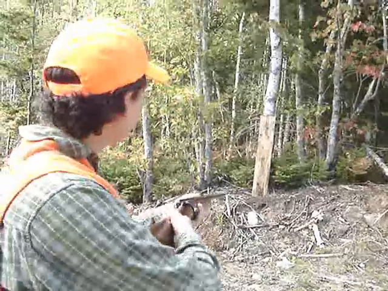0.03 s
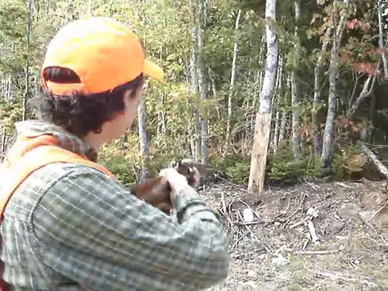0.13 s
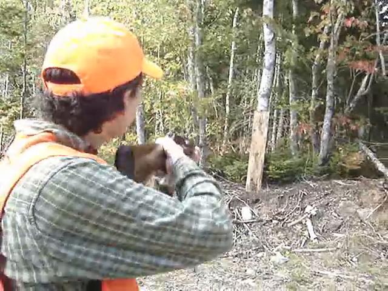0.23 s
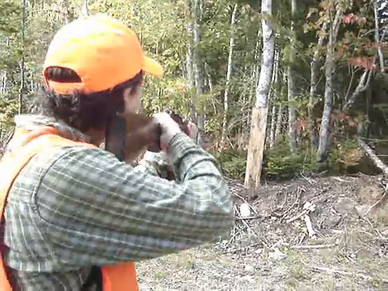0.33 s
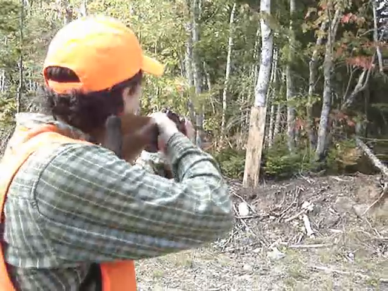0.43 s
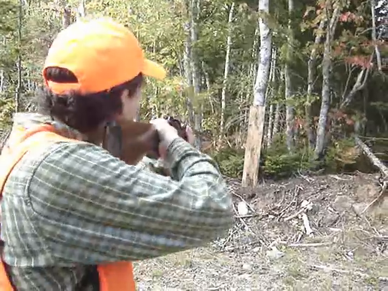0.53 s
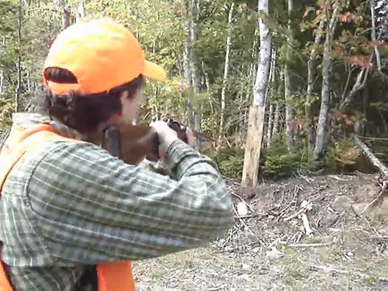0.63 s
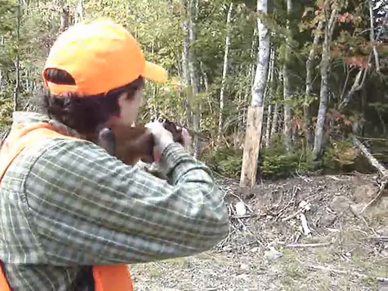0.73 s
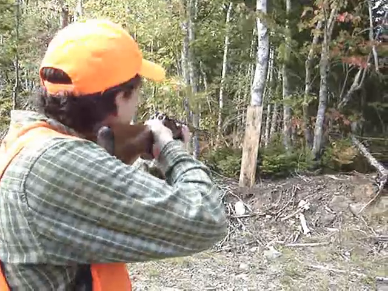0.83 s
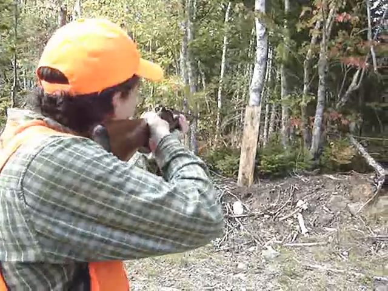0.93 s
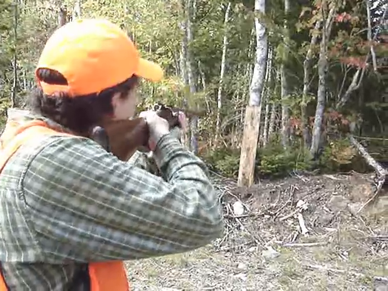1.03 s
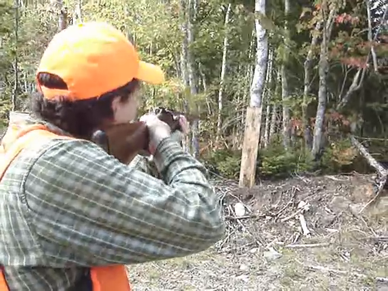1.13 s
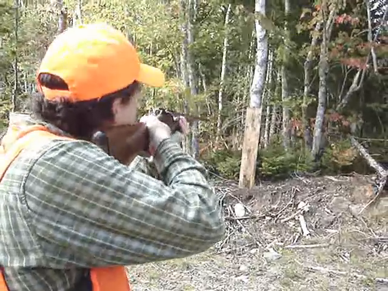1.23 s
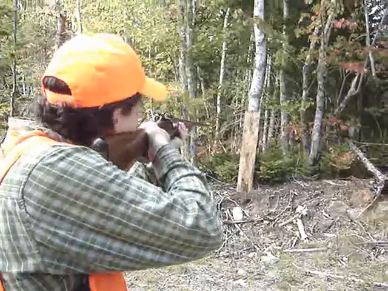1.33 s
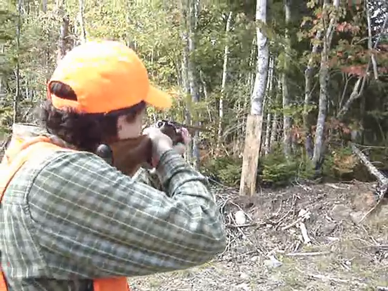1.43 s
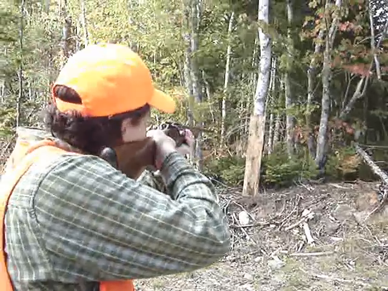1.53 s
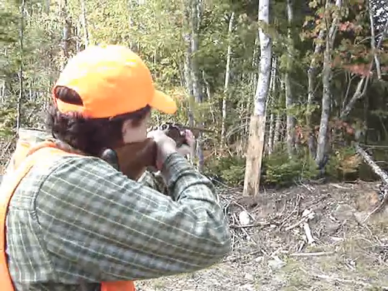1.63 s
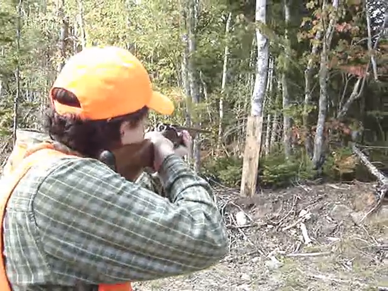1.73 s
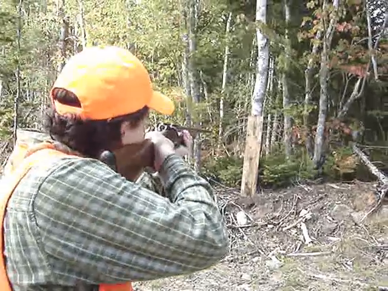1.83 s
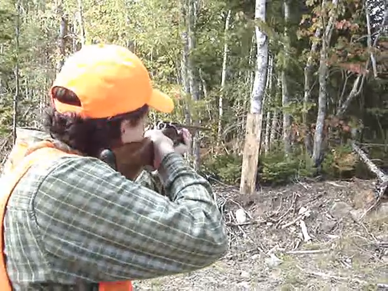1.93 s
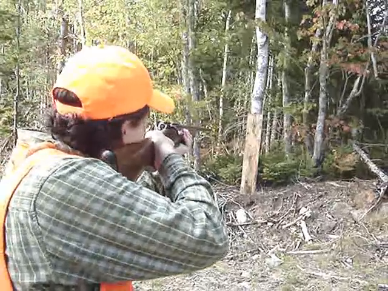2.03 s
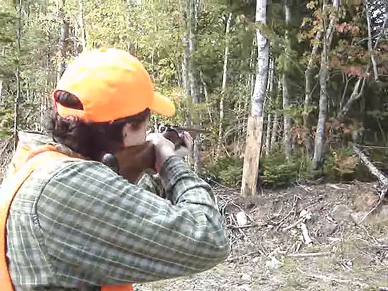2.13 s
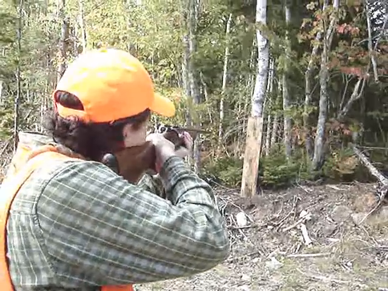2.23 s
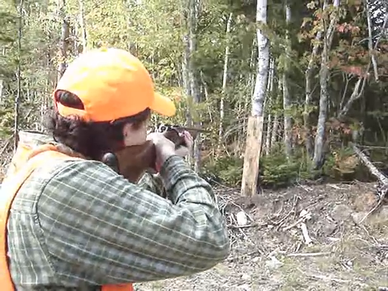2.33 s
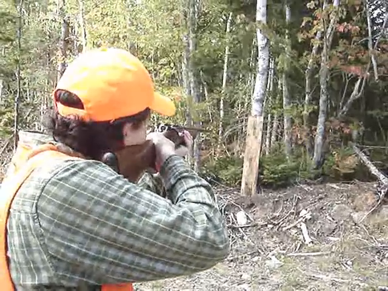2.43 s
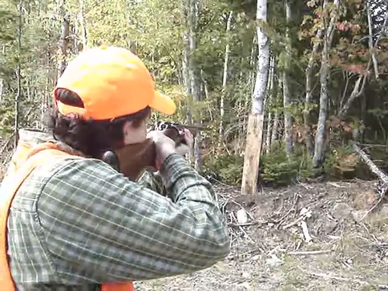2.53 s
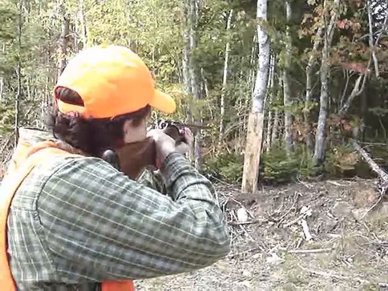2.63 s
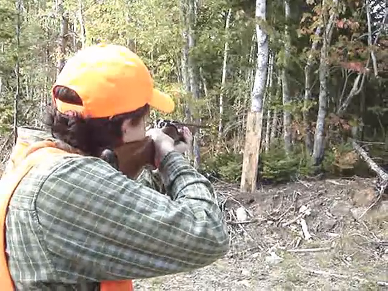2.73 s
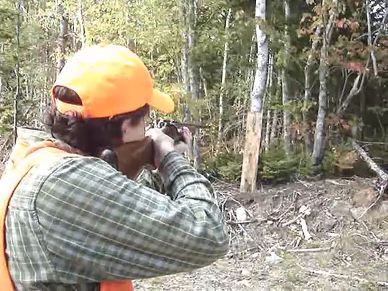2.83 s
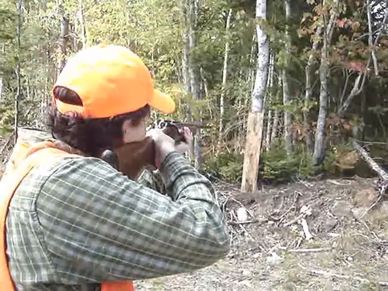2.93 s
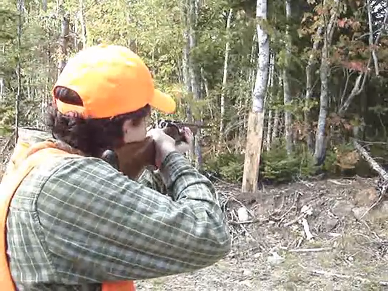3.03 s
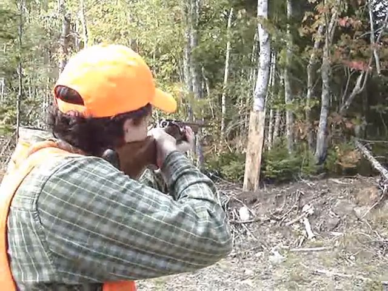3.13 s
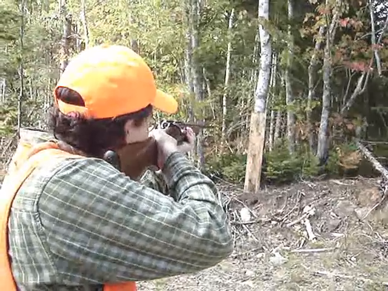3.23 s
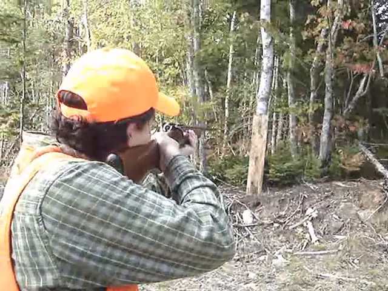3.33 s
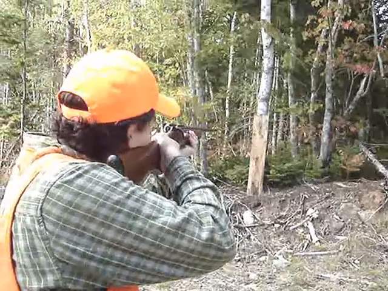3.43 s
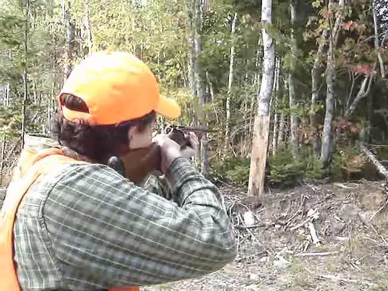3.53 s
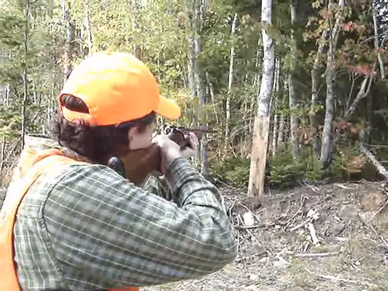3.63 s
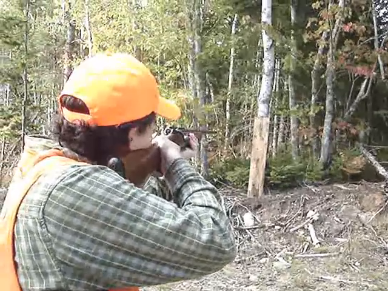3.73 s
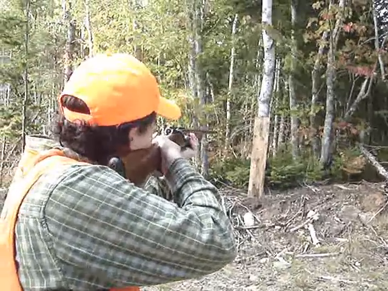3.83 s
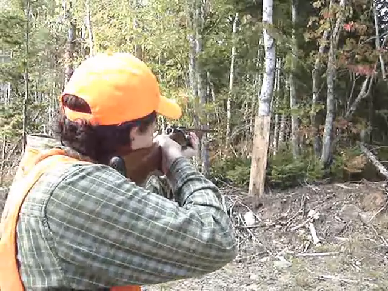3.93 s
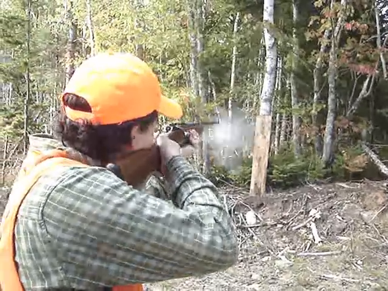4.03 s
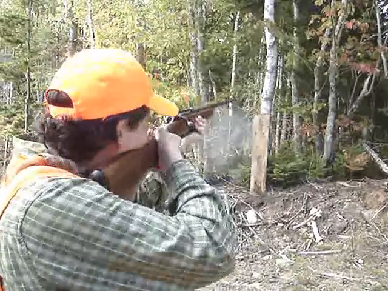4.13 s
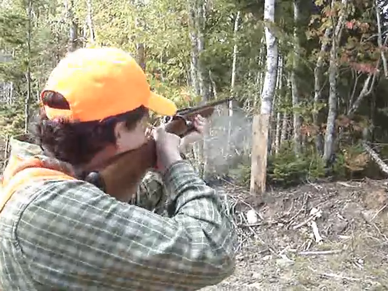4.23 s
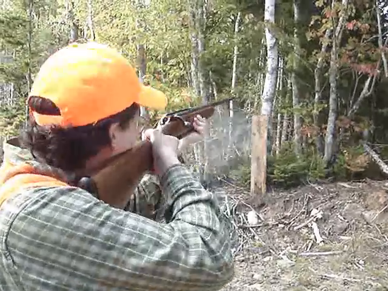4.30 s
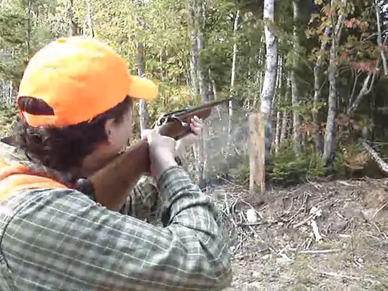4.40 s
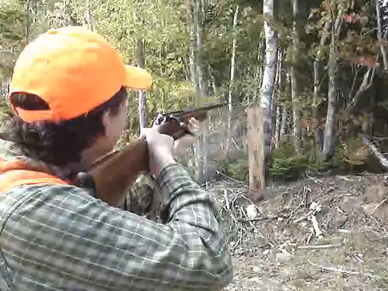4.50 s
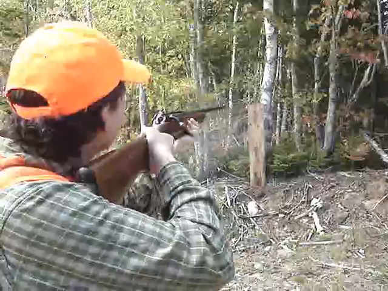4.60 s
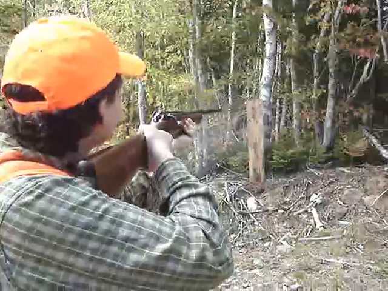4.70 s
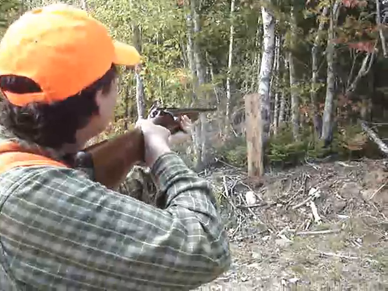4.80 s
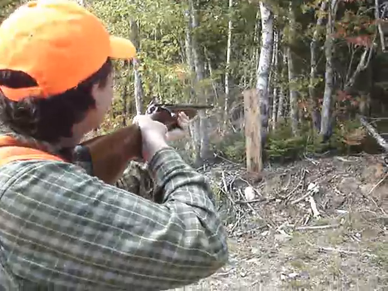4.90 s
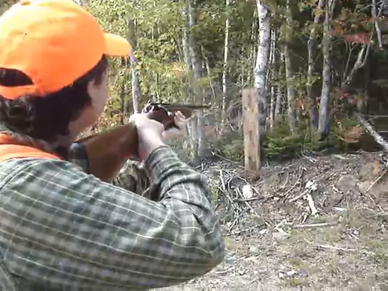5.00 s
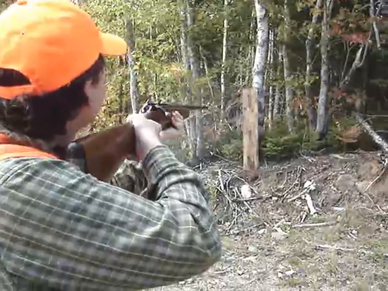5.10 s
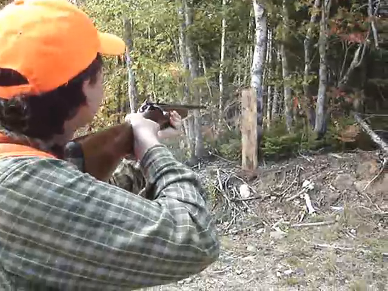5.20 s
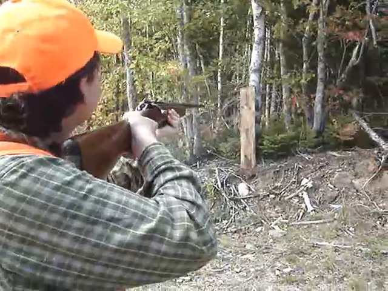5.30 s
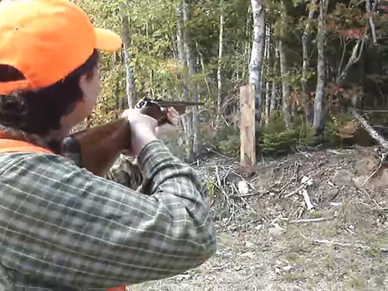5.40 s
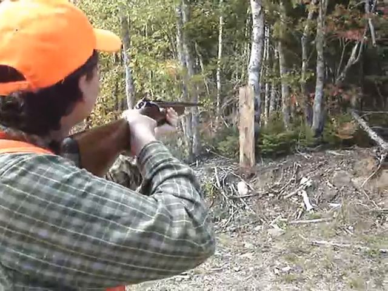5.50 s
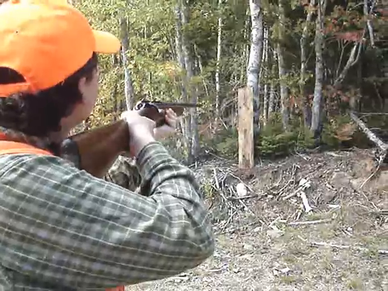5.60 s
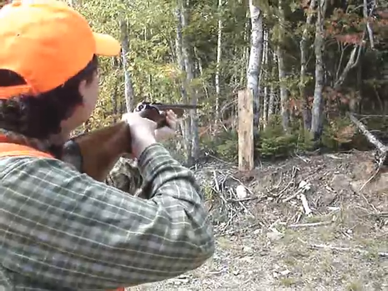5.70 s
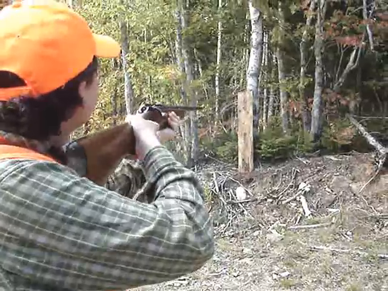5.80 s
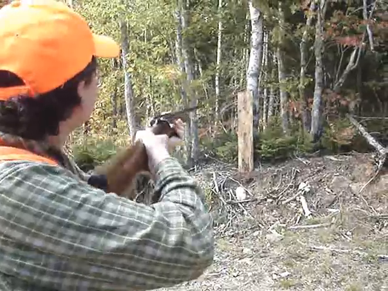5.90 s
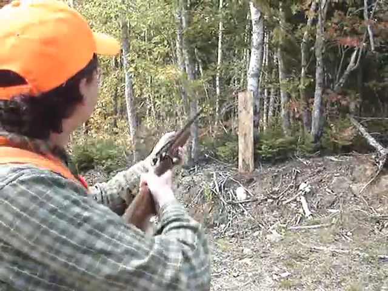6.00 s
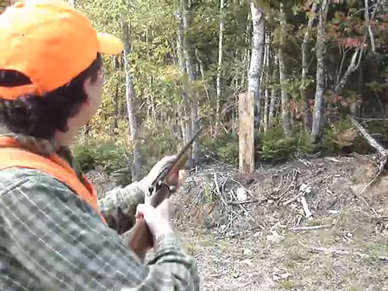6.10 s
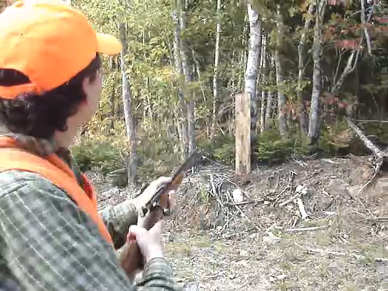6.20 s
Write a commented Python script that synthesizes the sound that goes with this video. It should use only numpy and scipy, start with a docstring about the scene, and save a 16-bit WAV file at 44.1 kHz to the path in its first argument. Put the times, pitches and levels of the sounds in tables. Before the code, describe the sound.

Very quiet clearing: leaf breeze, faint high whistle, evenly spaced soft insect trills and several brighter three-stroke chirps. Sleeves slide at the start. Then a sudden hammer snap and explosive shot, close and distorted on a small automatic-level microphone, with dense bright scatter from nearby trees and a deeper-placed mid-toned forest roll that dips and swells while dying away. Light stock taps, a clearer knock and fabric rustle end it.

```python
"""Shotgun shot at the edge of a wood

One shot, heard from just behind the shooter, amid breeze, steady thin tones and two crickets.
The blast is a train of pressure pushes; decaying noise forms the near scatter and the forest's roll.
Gain control ducks and creeps back while peaks saturate; knocks and rustles follow as the gun is lowered.
"""
import sys
import numpy as np
from scipy import signal
from scipy.fft import rfft, irfft, next_fast_len
from scipy.io import wavfile
from scipy.ndimage import uniform_filter1d, map_coordinates

SR = 44100
rng = np.random.default_rng(int(sys.argv[2]) if len(sys.argv) > 2 else 0)


def output_pcm(signal):
    """Save a mono or channel-first signal as 16-bit PCM at the path in sys.argv[1].

    Samples are clipped to [-1, 1] before scaling.
    """
    pcm = np.clip(np.atleast_2d(signal).T, -1, 1) * 32767
    wavfile.write(sys.argv[1], SR, np.round(pcm).astype(np.int16))


N = 275669

SHOT_S = 4.1606  # the blast reaches the microphone
STROKE_S = 0.026  # length of a cricket's wing stroke


def amp(db):
    """Decibels to gain."""
    return 10 ** (np.asarray(db) / 20)


def unit(x):
    """Scale to rms 1."""
    return x / np.sqrt(np.mean(x ** 2) + 1e-20)


def clock():
    """Time of every sample, s."""
    return np.arange(N) / SR


def along(points, hz):
    """Interpolate (f/Hz, value) points on a log frequency axis."""
    f, v = np.transpose(points)
    return np.interp(np.log(hz + 1), np.log(f + 1), v)


def wobble(rate_hz):
    """Smooth random curve with rate_hz knots a second."""
    knots = rng.standard_normal(int(N * rate_hz / SR) + 4)
    return map_coordinates(knots, [clock() * rate_hz])


def swell(middle_s, spread_s):
    """Bell-shaped rise and fall with a top of 1, down to 1/e at spread_s from the middle."""
    return np.exp(-((clock() - middle_s) / spread_s) ** 2)


def filtered(x, response):
    """Multiply the spectrum of x by a response of frequency."""
    m = next_fast_len(N + SR // 2)
    return irfft(rfft(x, m) * response(np.fft.rfftfreq(m, 1 / SR)), m)[:N]


def noise(colour):
    """Noise of rms 1 shaped by (f/Hz, relative level/dB) points."""
    return unit(filtered(rng.standard_normal(N), lambda hz: amp(along(colour, hz))))


def band(centre_hz, width_hz):
    """Narrow noise of rms 1."""
    return unit(filtered(rng.standard_normal(N), lambda hz: 1 / (1 + ((hz - centre_hz) / width_hz) ** 4)))


def background(air_db=-53.55, sway_db=0.2, lull_db=-70, gust_spread_s=0.2):
    """Light breeze in leaves over hiss, swaying slowly; a low murmur in the wood swells with each gust."""
    # breeze and hiss spectrum: f/Hz, relative level/dB
    air_colour = [(25, -10.5), (60, -5), (110, -5), (280, -0.5), (700, -1.3), (1300, -6), (2200, -7),
                  (2500, -9), (3500, -9.7), (5000, -9), (6500, -14), (8500, -15), (9900, -19.5),
                  (10300, -27), (15500, -24.5)]
    # gusts deep in the wood: t/s, level/dB
    gusts = [(.28, -60), (1.2, -60.5), (2.33, -66), (5.95, -62)]
    breeze = noise(air_colour) * amp(air_db + sway_db * wobble(1.3))
    gust_power = sum((amp(db) * swell(s, gust_spread_s)) ** 2 for s, db in gusts)
    wind = np.sqrt(amp(lull_db) ** 2 + gust_power)
    murmur = band(centre_hz=289, width_hz=115) * wind * amp(1.7 * wobble(7.6))
    return breeze + murmur


def whine(restart_hz=29.98, halo_db=-72):
    """Thin electronic tones whose phase restarts at restart_hz, with a narrow band of hiss."""
    # steady tones: f/Hz, level/dB
    tones = [(7870, -62), (8940, -72.5), (12042, -79.5)]
    since_restart_s = clock() % (1 / restart_hz)
    whistle = sum(amp(db) * unit(np.sin(2 * np.pi * hz * since_restart_s)) for hz, db in tones)
    return whistle + amp(halo_db) * band(centre_hz=7600, width_hz=300)


def sleeves():
    """Flannel sleeves slide as the gun is raised and lowered: swells of soft coloured noise."""
    # arm movements: t/s, spread/s, level/dB
    movements = [(.16, 0.54, -57), (6.2, 0.51, -56.5)]
    swish = noise([(300, -11), (900, 1.5), (2100, 5), (2700, -2), (3300, 2.5), (5000, -7), (9000, -16)])
    return swish * sum(amp(db) * swell(s, spread_s) for s, spread_s, db in movements)


def far_cricket(period_s=0.48, level_db=-61, spread_s=0.11, flutter_db=2):
    """Evenly spaced chirps; distance smears each into a soft, fluttering swell of narrow noise."""
    # singing bouts: first chirp/s, end/s
    bouts = [(.14, 4.1), (5.24, 6.3)]
    trill = unit(band(centre_hz=5430, width_hz=220) * amp(flutter_db * wobble(50)))
    times_s = [s for start_s, end_s in bouts for s in np.arange(start_s, end_s, period_s)]
    return trill * sum(swell(s, spread_s) for s in times_s) * amp(level_db)


def wing_stroke(hz, sag_hz=150, rough_rad=0.69):
    """Short raspy tone, highest where the wing is fastest; the scraper catches the teeth unevenly."""
    # faint inharmonic high tones sounding with each stroke: ratio to pitch, level re main tone/dB
    side_tones = [(1.495, -21), (2.215, -33), (2.38, -29), (2.61, -27), (3.11, -21)]
    u = np.linspace(-1, 1, round(STROKE_S * SR))
    slip = rough_rad * unit(uniform_filter1d(rng.standard_normal(u.size), size=110))
    phase = 2 * np.pi * np.cumsum(hz - sag_hz * u ** 2) / SR
    sides = sum(amp(db) * np.sin(ratio * phase + slip) for ratio, db in side_tones)
    return np.cos(np.pi * u / 2) * (np.sin(phase + slip) + sides)


def near_cricket(count=3, gap_s=0.0405, opening_db=-5, opening_flat_hz=100, tail_db=-6.5, tail_t60_s=0.69):
    """Chirps of evenly spaced wing strokes, the first weaker and flatter; trunks echo, the wood adds a tail."""
    # last stroke of each chirp: middle/s, level/dB, f/Hz
    chirps = [(1.061, -47, 4810), (1.771, -43, 4840), (2.183, -44.5, 4840), (2.648, -44.5, 4840),
              (3.067, -44.5, 4870), (4.012, -46.5, 4920)]
    # echoes from the nearest trunks: delay/s, level/dB
    trunk_echoes = [(.016, -14), (.03, -11)]
    song = np.zeros(N)
    for last_s, db, hz in chirps:
        for k in range(count):
            opening = k == 0
            stroke = amp(db + opening_db * opening) * wing_stroke(hz - opening_flat_hz * opening)
            start_s = last_s - (count - 1 - k) * gap_s - STROKE_S / 2
            song[round(start_s * SR):][:stroke.size] += stroke
    echoes = sum(amp(db) * np.roll(song, round(delay_s * SR)) for delay_s, db in trunk_echoes)
    age_s = np.arange(SR // 2) / SR
    tail = rng.standard_normal(age_s.size) * amp(-60 * age_s / tail_t60_s)
    tail /= np.linalg.norm(tail)
    return song + echoes + amp(tail_db) * signal.fftconvolve(song, tail)[:N]


def hammer(lead_s=0.004, start_db=-42, end_db=-18):
    """Hammer and primer snap: a burst of noise growing until the blast."""
    u = (clock() - SHOT_S) / lead_s + 1
    growth = amp(start_db + (end_db - start_db) * np.clip(u, 0, 1))
    snap = noise([(200, 2), (1000, 3), (3000, -6), (7000, -1), (10000, -26)])
    return snap * growth * (u > 0) * (u < 1)


def shot_age():
    """Time since the shot, s; 0 before it."""
    return np.maximum(clock() - SHOT_S, 0)


def blast(steepness=1.75):
    """Steep pressure pushes, each followed by a shallow suction: muzzle, then ground and trunks."""
    # direct blast and strongest returns: t/s, level before rounding/dB, push length/s
    pushes = [(4.1607, 19, 0.00058), (4.1626, 2, 0.00033), (4.163, 13, 0.00028), (4.1725, 13.5, 0.0004),
              (4.1861, 12, 0.00054), (4.1889, 17.5, 0.00031), (4.1968, 18, 0.00028)]
    t, pressure = clock(), np.zeros(N)
    for s, db, push_s in pushes:
        u = np.maximum(t - s, 0) / push_s
        pressure -= amp(db) * (t >= s) * (1 - u) * np.exp(-steepness * u)
    # each push arrives with its edge rounded, its highest treble dulled
    return filtered(pressure, lambda hz: np.exp(-(hz / 5000) ** 2))


def thump(level_db=-33, t60_s=0.55):
    """Thump of the ground: low noise that starts at the shot and decays."""
    rumble = noise([(20, 9), (60, 4), (120, -13), (300, -12), (900, -25), (3000, -82)])
    age_s = shot_age()
    return rumble * (age_s > 0) * amp(level_db - 60 * age_s / t60_s)


def scatter(colour, decay, lumpy_db):
    """Dense decaying noise; each frequency fades at its own rate."""
    hz, t, z = signal.stft(noise(colour), SR, nperseg=512)
    fade_db = -60 * np.maximum(t - SHOT_S, 0) / along(decay, hz)[:, None]
    echoes = signal.istft(z * amp(fade_db), SR, nperseg=512)[1][:N]
    onset = np.clip((clock() - SHOT_S) / 0.001, 0, 1) ** 2
    # clumps of trees return more than the gaps between them
    return echoes * onset * amp(lumpy_db * (wobble(60) + wobble(400)))


def near_trunks(level_db=5.5, open_ground_db=-3.5, tree_line_s=0.029):
    """Scatter nearby; the open ground returns less until the tree line answers."""
    # spectrum: f/Hz, relative level/dB
    near_colour = [(60, -30), (230, -22.5), (380, -12.5), (570, -3), (850, -8), (1300, 0), (2000, -3),
                   (2900, -2.5), (5300, -5.5), (8500, -14), (10500, -24), (12500, -28), (15500, -20.5)]
    # decay: f/Hz, t60/s
    near_decay = [(100, 0.5), (300, 0.76), (1000, .98), (2500, .89), (5000, 0.64), (8000, 0.57),
                  (14000, 0.85)]
    open_ground = 0.5 - 0.5 * np.tanh((shot_age() - tree_line_s) / 0.0045)
    return scatter(near_colour, near_decay, lumpy_db=0.5) * amp(level_db + open_ground_db * open_ground)


def forest_roll(level_db=-14, build_s=0.16):
    """Roll from deep in the forest: builds up, then, the forest being uneven, sinks and swells again."""
    # spectrum: f/Hz, relative level/dB
    far_colour = [(20, -15.5), (65, -26.5), (150, -45), (260, -25), (400, -11.5), (560, -3.5), (800, -4),
                  (1250, 1.7), (2500, -6), (4500, -15.5), (8000, -28), (10700, -28), (12200, -39),
                  (13600, -31)]
    # decay: f/Hz, t60/s
    far_decay = [(400, 4.4), (1000, 3.02), (2000, 2.35), (4000, 2.1), (14000, 3.17)]
    # dip and swell: delay after shot/s, spread/s, level change/dB
    returns = [(.82, .05, -3), (.95, .06, 2)]
    depth = 1 - np.exp(-(shot_age() / build_s) ** 2)
    uneven_db = sum(db * swell(SHOT_S + delay_s, spread_s) for delay_s, spread_s, db in returns)
    return scatter(far_colour, far_decay, lumpy_db=1.1) * depth * amp(level_db + uneven_db)


def handling(attack_s=0.0026):
    """Stock knocks softly as decaying modes; hands and sleeves brush it as decaying noise."""
    # contacts: t/s, knock gain/dB, rustle gain/dB, rustle t60/s
    contacts = [(5.046, -26, -52, 0.017), (5.0808, -31, -36, 0.031), (5.1238, -37, -42, 0.07),
                (5.134, -29, -50, .03), (5.3195, -15.5, -48, 0.5), (6.1118, -50, -47, .05)]
    # modes of the wooden stock: f/Hz, relative level/dB, t60/s
    stock_modes = [(507, -11, 0.041), (593, 3.5, 0.022), (735, 1, 0.013), (175, -26, 0.046)]
    out, t = np.zeros(N + SR), np.arange(SR // 4) / SR
    cloth = noise([(300, -6), (1500, 0), (3500, 2.5), (7000, -2), (11000, -13), (15000, -24)])
    wood = sum(amp(db - 60 * t / t60_s) * np.sin(2 * np.pi * hz * t) for hz, db, t60_s in stock_modes)
    wood = wood * (1 - np.exp(-t / attack_s))
    for s, knock_db, rustle_db, rustle_t60_s in contacts:
        brush = np.roll(cloth, rng.integers(N))[:t.size] * amp(rustle_db - 60 * t / rustle_t60_s)
        out[round(s * SR):][:t.size] += amp(knock_db) * wood + brush
    return out[:N]


def scene():
    """Everything summed at one microphone."""
    shot = blast() + thump() + near_trunks() + forest_roll()
    gun = sleeves() + hammer() + shot + handling()
    return (background() + whine() + far_cricket() + near_cricket() + gun)[None]


def record(dry, ceiling_db=1.0, release_s=1.32, attack_s=0.0005, top_hz=15800):
    """Gain control ducks on the blast and recovers slowly; what slips past saturates; low-pass on top."""
    over_db = np.maximum(20 * np.log10(np.abs(dry[0]) + 1e-9) - ceiling_db, 0)
    # peak hold with exponential release
    recovery = np.exp(-clock() / release_s)
    duck_db = np.maximum.accumulate(over_db / recovery) * recovery
    keep = np.exp(-1 / (attack_s * SR))
    ducked = dry[0] * amp(-signal.lfilter([1 - keep], [1, -keep], duck_db))
    saturated = ducked / (1 + ducked ** 4) ** 0.25
    return filtered(saturated, lambda hz: 1 / (1 + (hz / top_hz) ** 200))[None]


dry = scene()
out = record(dry)
output_pcm(out)
```